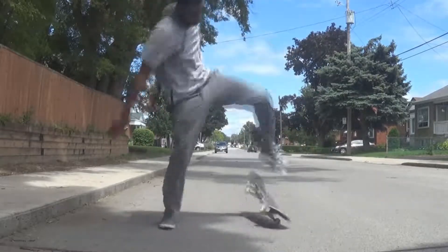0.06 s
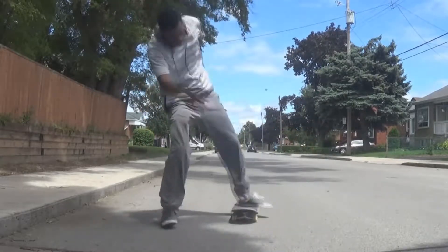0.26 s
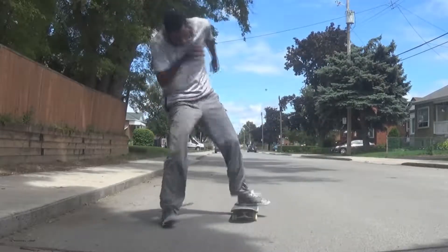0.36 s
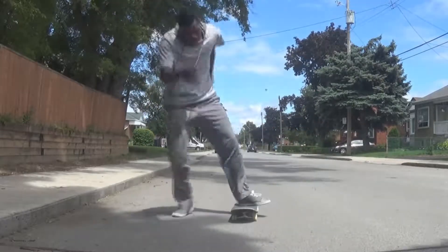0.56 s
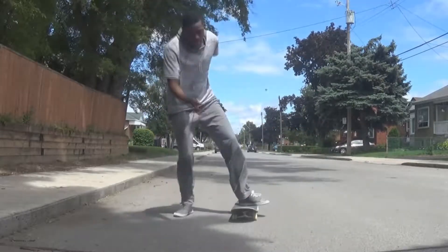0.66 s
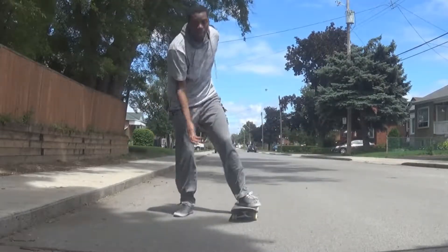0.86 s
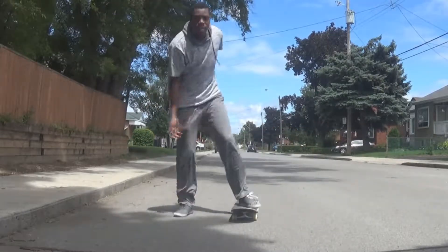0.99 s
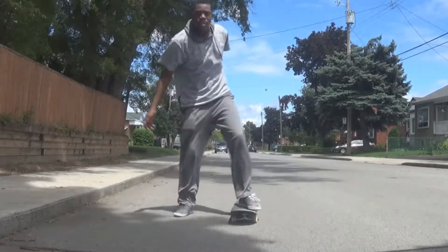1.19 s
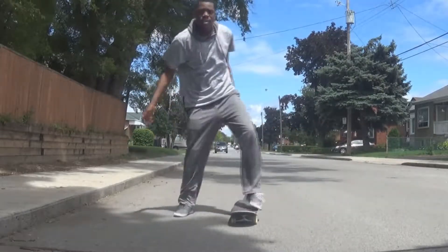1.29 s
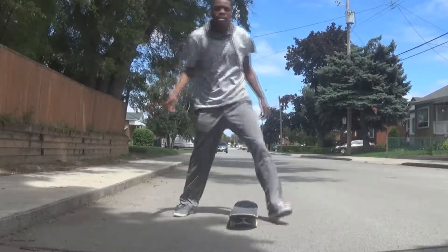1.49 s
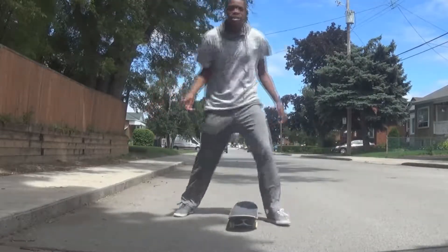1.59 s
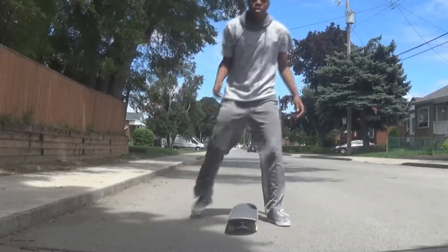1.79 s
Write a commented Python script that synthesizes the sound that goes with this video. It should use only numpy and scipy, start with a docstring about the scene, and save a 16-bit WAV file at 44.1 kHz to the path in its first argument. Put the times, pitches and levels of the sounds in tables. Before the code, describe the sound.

A flipped skateboard hits the road in a tight burst of sharp cracks and hollow wooden clacks, then a brief scuff, a light knock, and finally rattling, crunchy rolling; close stereo microphone, short outdoor echo, faint street hiss.

```python
"""A flipped skateboard clatters onto rough asphalt close by: deck, trucks and wheels hit in turn, a foot stamps it down.
Shoe soles scuff, the board creeps over the grit, then rolls free with its loose trucks knocking.
Blows are noise bursts and clicks exciting damped modes; scuffs and rolling are filtered random clicks.
Fences and house fronts add a short echo of decaying noise, over the filtered-noise hiss of a quiet street."""
import sys
import numpy as np
from scipy import signal
from scipy.fft import rfft, irfft
from scipy.io import wavfile

SR = 44100
rng = np.random.default_rng(int(sys.argv[2]) if len(sys.argv) > 2 else 0)


def unload_audio(sound):
    """Save the sound as a 16-bit wav file, at the path given as the first command line argument."""
    columns = np.transpose(np.atleast_2d(sound))
    # keep every value between -1 and 1, then stretch to whole-number steps
    steps = np.round(np.clip(columns, -1, 1) * 32767)
    wavfile.write(sys.argv[1], SR, steps.astype(np.int16))


N = 81585


def undb(db):
    """Logarithmic level: decibels to amplitude gain."""
    return 10 ** (np.asarray(db) / 20)


def unit(x):
    """Normalisation: scale to rms 1."""
    return x / np.sqrt(np.mean(x ** 2))


def clock():
    """Sampling: the time of every sample in seconds."""
    return np.arange(N) / SR


def fade(age, t60):
    """Exponential damping: full level until age 0, then a fall of 60 dB in t60 seconds."""
    return np.exp(-np.log(1000) * np.maximum(age, 0) / t60)


def colour(x, points):
    """Minimum-phase filtering through (Hz, dB) points, scaled to unit gain for white noise."""
    hz, db = np.array(points, float).T
    half = 2048
    f = np.maximum(np.arange(half + 1) * SR / (2 * half), 1)
    gain = unit(undb(np.interp(np.log(f), np.log(hz), db)))
    # Folding the cepstrum onto positive times makes the filter causal.
    cepstrum = irfft(np.log(gain))
    cepstrum[1:half] *= 2
    cepstrum[half + 1:] = 0
    impulse_response = irfft(np.exp(rfft(cepstrum)))
    return signal.oaconvolve(x, impulse_response)[:len(x)]


def split(x, hz):
    """Complementary crossover: the parts below and above a frequency, which add up to x."""
    low = signal.sosfiltfilt(signal.butter(2, hz, fs=SR, output="sos"), x)
    return low, x - low


def noise(size=N):
    """White noise: equal power at every frequency."""
    return rng.standard_normal(size)


def grit(rate, spread_db, size=N):
    """Random impulse train: clicks of either sign and uneven size, at a mean rate per second."""
    clicks = (rng.random(size) < rate / SR) * np.sign(noise(size))
    sizes = undb(spread_db * np.minimum(rng.exponential(size=size), 4))
    return unit(clicks * sizes)


def waver(spread_db, seconds):
    """Random amplitude modulation: a gain gliding to a new value every so many seconds, rms 1."""
    knots = np.arange(0, N / SR + seconds, seconds)
    return unit(undb(spread_db * np.interp(clock(), knots, noise(len(knots)))))


PART_DB, PART_Q = 5.5, 3.1  # gain at the peak, sharpness


def lift(x, hz):
    """Resonance: bring out the frequencies near that of the part that was struck."""
    return x + (undb(PART_DB) - 1) * signal.lfilter(*signal.iirpeak(hz, PART_Q, fs=SR), x)


# Blows of the board on the road. Each row: start in seconds, level in dB, bass in dB,
# crack in dB relative to CRACK_DB, contact in seconds, main resonance of the struck part in Hz.
BLOWS_ON_ROAD = [(0.1995, -30.5, -19, 20, 0.0015, 6800), (0.2025, -19, -19, -15, 0.0038, 1543),
                 (.209, -23, -10, -3, 0.0032, 3515), (.215, -22.5, 4, 9.5, .004, 1228),
                 (.251, -16.5, -0.5, -6, .004, 2610), (0.2558, -17, -5.5, -12, .006, 1937),
                 (.263, -25.5, 5, -5, .003, 297), (.277, -21, -2, 1.5, 0.0028, 1335),
                 (.303, -24.5, 4.5, -22, 0.011, 1030), (.322, -18.5, -3, 1, 0.0032, 1090),
                 (.332, -19, -0.5, -12, .008, 1546), (0.3532, -19, -2, 7, 0.0018, 392),
                 (.358, -19.5, -1, 0, 0.0038, 1030), (.367, -21.5, 6.5, 5.5, 0.007, 1685),
                 (.387, -21, 5, -1, 0.003, 672), (.394, -22.5, -2.5, 1, 0.0045, 1050),
                 (.404, -22.5, 4, -13, 0.0073, 1577), (.42, -27.5, -5, -17, .008, 1670)]
# Ring of the deck and trucks. Each row: frequency in Hz, relative level in dB, 60 dB decay in seconds.
DECK_MODES = [(439.3, 1, .26), (567, -4.5, 0.24), (665.6, -2, 0.15), (716, 4, 0.16), (770, -2, 0.49),
              (1030, -0.5, 0.23), (1110, -11, 0.088), (1543, 7, 0.13), (1734, 3, .28), (1863, 3, 0.064),
              (2085, 0, 0.16), (2557, 1.5, 0.083), (3440, 2, 0.077)]
# Spectrum of the dense woody overtones and the scrape. Each row: frequency in Hz, relative level in dB.
WOODY_SPECTRUM = [(60, -37), (160, -36.5), (260, -12.5), (420, -0.5), (700, 3), (860, -0.5), (1100, 3.5),
                  (1700, 3), (3800, -6.5), (5400, -9.5), (7600, -24), (16000, -26.5)]
# Spectrum of the crack. Each row: frequency in Hz, relative level in dB.
CRACK_SPECTRUM = [(250, -36), (1500, 11), (6400, 0.5), (7800, -11.5), (11000, -3.5), (16000, -11.5)]
RING_DB, CLACK_DB, SCRAPE_DB, CRACK_DB, CHATTER_DB, PART_RING_DB = -2.5, -2.5, -5, -4.5, -3.5, 2.5
CLACK_T60_S, CLACK_TREBLE_T60_S, CRACK_T60_S, SCRAPE_T60_S, PART_T60_S = 0.1, .21, 0.0083, 0.036, 0.048
BASS_HZ = 634  # the bass level of a blow acts below this
BOUNCES_PER_S = 1200
KNOCK_RISE_S = .001  # time constant of the onset


def landing():
    """Modal excitation: each blow cracks and chatters on the road, ringing the deck and the struck part."""
    size = SR // 2
    age, out = clock()[:size], np.zeros(N)
    deck = sum(undb(db) * np.sin(2 * np.pi * hz * age) * fade(age, t60) for hz, db, t60 in DECK_MODES)
    deck = deck / np.linalg.norm(undb(np.array(DECK_MODES)[:, 1]))
    for start, db, bass_db, crack_db, contact, part_hz in BLOWS_ON_ROAD:
        # Each spot on the deck has its own overtones.
        low, high = split(noise(size), hz=3030)
        overtones = low * fade(age, CLACK_T60_S) + high * fade(age, CLACK_TREBLE_T60_S)
        overtones = colour(overtones, WOODY_SPECTRUM)

        # The strike is one impulse plus small bounces for as long as contact lasts.
        chatter = grit(BOUNCES_PER_S, 0, size) * (age < contact) / np.sqrt(contact * SR)
        strike = (age == 0) + undb(CHATTER_DB) * chatter
        ring = undb(RING_DB) * signal.fftconvolve(strike, deck)[:size]
        clack = undb(CLACK_DB) * signal.fftconvolve(strike, overtones)[:size]
        scrape = colour(noise(size) * fade(age - contact, SCRAPE_T60_S), WOODY_SPECTRUM)
        bass, rest = split(ring + clack + undb(SCRAPE_DB) * scrape, BASS_HZ)

        crack = grit(rate=9700, spread_db=-2.5, size=size) * fade(age - contact / 2, CRACK_T60_S)
        crack = colour(crack, CRACK_SPECTRUM)
        body = lift(undb(bass_db) * bass + rest + undb(CRACK_DB + crack_db) * crack, part_hz)

        onset = 1 - np.exp(-age / KNOCK_RISE_S)
        part = undb(PART_RING_DB) * np.sin(2 * np.pi * part_hz * age) * onset * fade(age, PART_T60_S)
        first = int(start * SR)
        out[first:first + size] += undb(db) * (part + body)
    return out


# The rider's weight thumps through the deck. Each row: start in seconds, level in dB.
WEIGHT_THUMPS = [(.322, -40), (.355, -42)]
# Spectrum of a thump. Each row: frequency in Hz, relative level in dB.
THUMP_SPECTRUM = [(25, -2), (70, 1), (200, -11), (600, -42)]
THUMP_T60_S = 0.021


def thumps():
    """Damped low-frequency impulse: a dull thud where the full weight comes down."""
    t = clock()
    level = sum(undb(db) * (t >= start) * fade(t - start, THUMP_T60_S) for start, db in WEIGHT_THUMPS)
    return colour(noise() * level, THUMP_SPECTRUM)


# Knocks of the loose trucks. Each row: start in seconds, ring level in dB,
# crunch in dB relative to that level, pitch of the ring in Hz.
TRUCK_KNOCKS = [(.7605, -34.5, -4, 1513), (1.326, -46, -3, 3870), (1.413, -38.5, -15, 1720),
                (1.433, -41.5, -6, 3900), (1.449, -36, -8, 2166), (1.4645, -33, -17, 1568),
                (1.485, -31, -12, 1610), (1.504, -28.5, -2.5, 1566), (1.532, -34.5, -22, 1528),
                (1.578, -36.5, -6, 1584), (1.633, -34.5, 3.5, 1725), (1.661, -32, -3, 1560),
                (1.7215, -31, -9, 1593), (1.78, -33, -7.5, 1563)]
# Partials of the ring. Each row: ratio to the pitch, level in dB, 60 dB decay in seconds.
TRUCK_PARTIALS = [(.44, -9, .085), (.66, -10, .07), (1, 6, .052)]
# Spectrum of wheels on asphalt, jolted or rolling. Each row: frequency in Hz, relative level in dB.
WHEEL_SPECTRUM = [(100, -32.5), (350, -14), (700, 2), (860, -3), (1060, 4.5), (1320, -1), (1580, 1),
                  (1950, -1.5), (6300, -13.5), (7700, -26.5), (11500, -22), (16000, -38)]
JOLT_T60_S = .09


def trucks():
    """Impact through free play: a short inharmonic metal ring and a crunch of the jolted wheels."""
    t, out = clock(), 0
    crunch = colour(noise(), WHEEL_SPECTRUM)
    for start, db, crunch_db, hz in TRUCK_KNOCKS:
        age = np.maximum(t - start, 0)
        ring = sum(undb(partial_db) * np.sin(2 * np.pi * hz * ratio * age) * fade(age, t60)
                   for ratio, partial_db, t60 in TRUCK_PARTIALS)
        jolt = undb(crunch_db) * crunch * fade(age, JOLT_T60_S)
        onset = 1 - np.exp(-age / KNOCK_RISE_S)
        out = out + undb(db) * (ring + jolt) * onset
    return out


RADIATE_HZ = 218  # the narrow deck radiates little below this


def radiate(x):
    """Acoustic short circuit: sound slips round a narrow board, so its deep bass cancels."""
    return signal.sosfilt(signal.butter(3, RADIATE_HZ, "highpass", fs=SR, output="sos"), x)


# Course of the rolling sound. Each row: time in seconds, mean level in dB before the random waver.
ROLLING_LEVEL = [(0, -40.5), (.1, -45), (.45, -33), (.62, -43.5), (.76, -43.5), (.86, -53), (.97, -45.5),
                 (1.1, -51), (1.33, -42), (1.57, -43.5), (1.8, -38), (1.85, -41)]
GRIT_PER_S, GRIT_SPREAD_DB = 3500, 2
WAVER_DB, WAVER_S = 1.5, .03


def wheels():
    """Roughness excitation: hard wheels and bearings whirr and crunch over the grain of the asphalt."""
    level = undb(np.interp(clock(), *np.array(ROLLING_LEVEL).T))
    rolling = colour(grit(GRIT_PER_S, GRIT_SPREAD_DB), WHEEL_SPECTRUM)
    return level * waver(WAVER_DB, WAVER_S) * rolling


# Grains of grit snapping under the wheels. Each row: start in seconds, level in dB.
GRIT_SNAPS = [(1.432, -36.5), (1.4803, -34.5), (1.501, -31.5), (1.542, -44), (1.554, -38), (1.6322, -29),
              (1.659, -32.5)]
# Spectrum of a snapping grain. Each row: frequency in Hz, relative level in dB.
SNAP_SPECTRUM = [(500, -4.5), (2000, 3.5), (6300, -0.5), (8200, -15), (11200, -0.5), (13000, -15),
                 (16000, -3.5)]
SNAP_T60_S, CRUMBLE_DB, CRUMBLE_T60_S = .012, -11, .12


def stones():
    """Brittle fracture: a grain of grit snaps under a wheel and crumbles in a scratchy crackle."""
    t, out = clock(), 0
    snap, crumbs = noise(), grit(BOUNCES_PER_S, GRIT_SPREAD_DB)
    for start, db in GRIT_SNAPS:
        age = t - start
        crumble = undb(CRUMBLE_DB) * crumbs * fade(age, CRUMBLE_T60_S)
        out = out + undb(db) * (age > 0) * (snap * fade(age, SNAP_T60_S) + crumble)
    return colour(out, SNAP_SPECTRUM)


# Sole scuffs on the road and grip tape. Each row: peak time in seconds, rise in seconds,
# fall in seconds (both Gaussian widths), level in dB, treble in dB relative to that level.
SOLE_SCUFFS = [(.549, .003, 0.0089, -49, 22.5), (0.597, 0.013, 0.028, -44.5, 9),
               (0.663, 0.006, 0.0037, -42.5, 1), (.689, 0.022, 0.016, -26.5, 2)]
# Spectrum of a sole on grit. Each row: frequency in Hz, relative level in dB.
SOLE_SPECTRUM = [(150, -30), (650, 2), (2100, 4.5), (3500, 1.5), (6300, -5), (7900, -22.5), (12500, -16),
                 (16000, -24)]
GRAIN_DB, GRAIN_S = 2.5, .003  # spread and step of the fine flutter


def shoes():
    """Stick-slip friction: rubber catches and slips over grit in short swells."""
    t, out = clock(), 0
    rubbing = grit(rate=15000, spread_db=-1.0) * waver(GRAIN_DB, GRAIN_S)
    low, high = split(colour(rubbing, SOLE_SPECTRUM), hz=4200)
    for peak, rise, fall, db, treble_db in SOLE_SCUFFS:
        swell = np.exp(-.5 * ((t - peak) / np.where(t < peak, rise, fall)) ** 2)
        out = out + undb(db) * swell * (low + undb(treble_db) * high)
    return out


ECHO_DB, ECHO_T60_S, ECHO_TREBLE_T60_S, ECHO_DELAY_S = -12.5, 0.48, 0.66, .018


def echo(x):
    """Diffuse reflection: delayed scatter from fences and house fronts, lasting longer in the treble."""
    age = clock() - ECHO_DELAY_S
    low, high = split(noise(), hz=3600)
    tail = (age > 0) * (low * fade(age, ECHO_T60_S) + high * fade(age, ECHO_TREBLE_T60_S))
    return undb(ECHO_DB) * signal.fftconvolve(x, tail / np.linalg.norm(tail))[:N]


# Spectrum of the quiet street. Each row: frequency in Hz, relative level in dB.
STREET_SPECTRUM = [(30, -32), (100, -10.5), (260, -5), (700, 0.5), (1000, -1), (1450, -8.5), (2600, -5.5),
                   (6600, -12.5), (7700, -23), (16000, -25.5)]
STREET_DB = -45.5


def street():
    """Incoherent summation: many distant sources, traffic and leaves, merge into a steady hiss."""
    return undb(STREET_DB) * colour(noise(), STREET_SPECTRUM)


WIDTH_DB, WIDTH_T60_S = -13, 0.15
HALF_LAG_S = .000007  # one channel is late and the other early by this


def scene():
    """Stereo by mid and side: the board is nearly straight ahead; scatter and a microphone lag widen it."""
    near = radiate(landing() + trucks()) + thumps() + shoes() + wheels() + stones()
    mid = near + echo(near) + street()
    scatter = noise() * fade(clock(), WIDTH_T60_S)
    scattered = undb(WIDTH_DB) * signal.fftconvolve(mid, scatter / np.linalg.norm(scatter))[:N]
    # A tiny time shift is nearly the slope times the lag.
    lag = HALF_LAG_S * SR * np.gradient(mid)
    side = signal.sosfiltfilt(signal.butter(8, 9800, fs=SR, output="sos"), scattered - lag)
    return np.array([mid + side, mid - side])


DIP_S, DIP_WIDTH_S, DIP_DB = 1.2925, .0025, -14  # centre, Gaussian width, depth
TOP_HZ = 16000


def record(dry):
    """Saturation and band limiting: the level dips briefly once, loud peaks are rounded, the top is cut."""
    dip = undb(DIP_DB * np.exp(-.5 * ((clock() - DIP_S) / DIP_WIDTH_S) ** 2))
    rounded = np.tanh(dry * dip)
    return signal.sosfilt(signal.ellip(8, .2, 70, TOP_HZ, fs=SR, output="sos"), rounded)


dry = scene()
out = record(dry)
unload_audio(out)
```